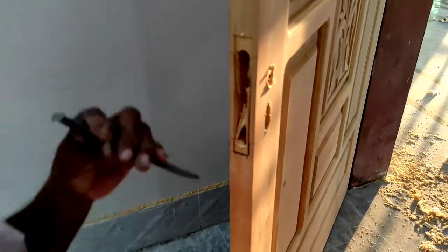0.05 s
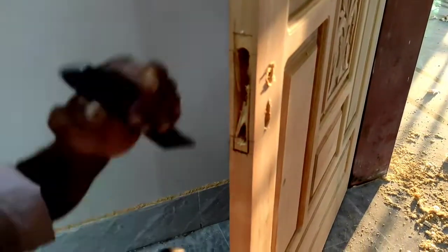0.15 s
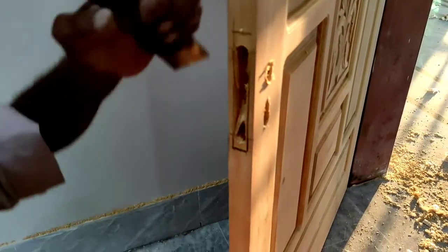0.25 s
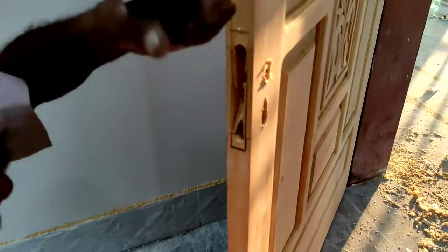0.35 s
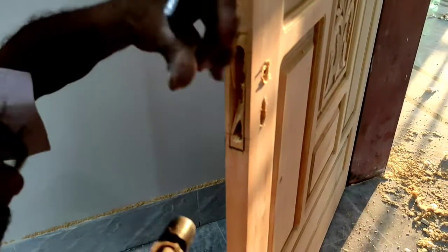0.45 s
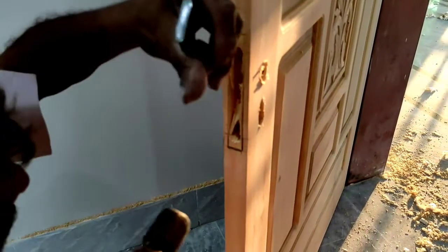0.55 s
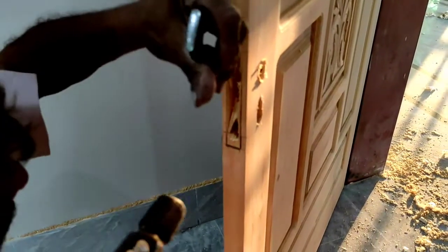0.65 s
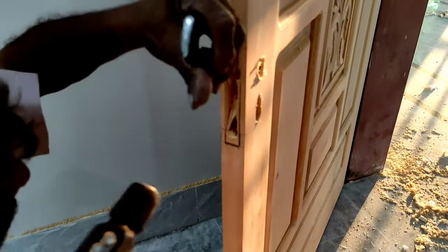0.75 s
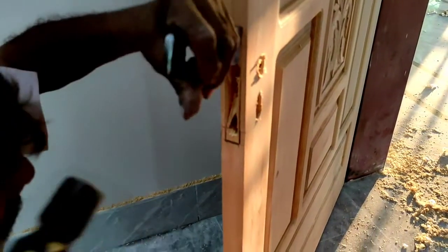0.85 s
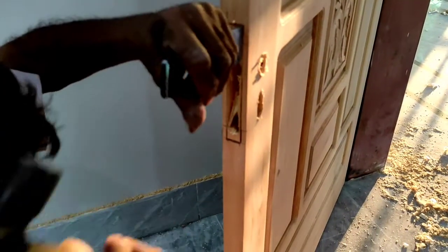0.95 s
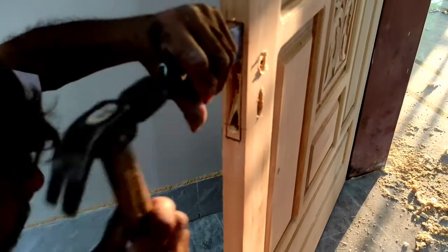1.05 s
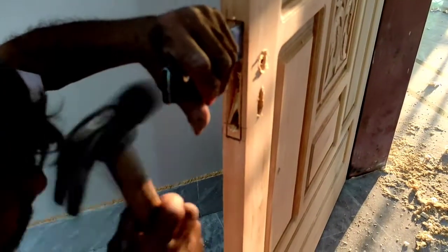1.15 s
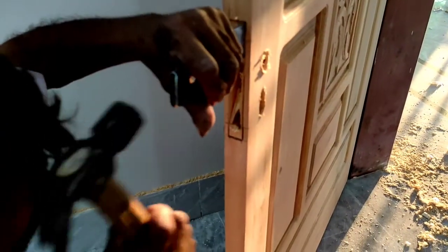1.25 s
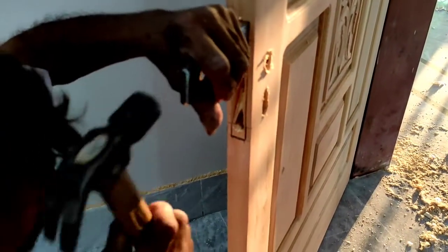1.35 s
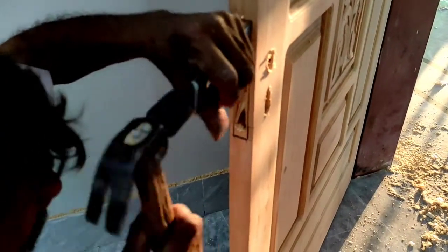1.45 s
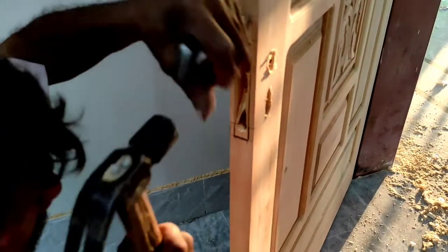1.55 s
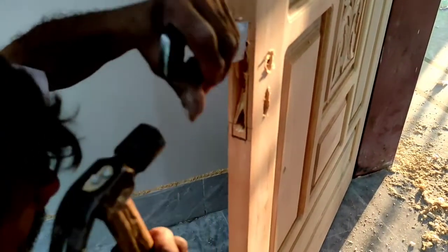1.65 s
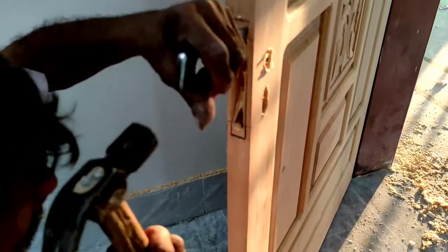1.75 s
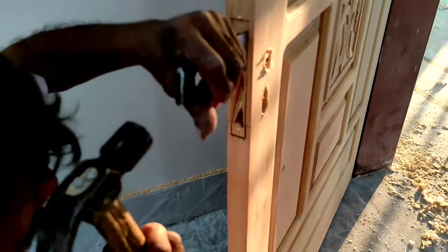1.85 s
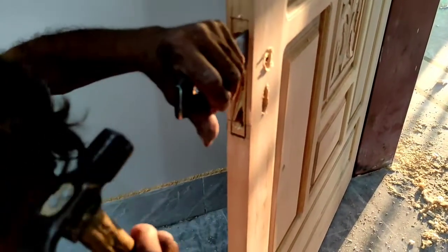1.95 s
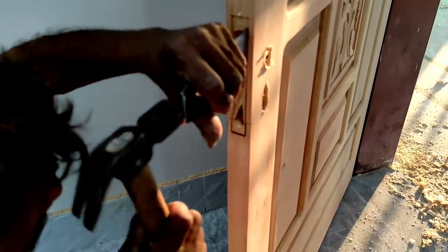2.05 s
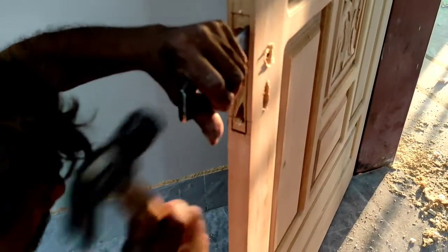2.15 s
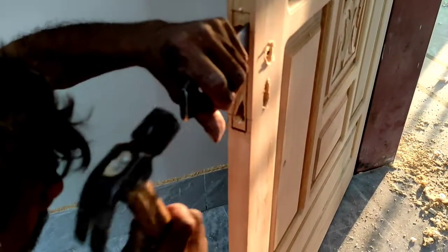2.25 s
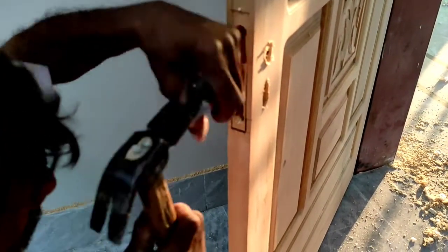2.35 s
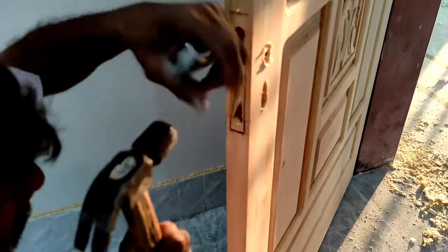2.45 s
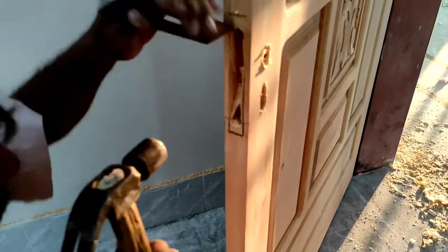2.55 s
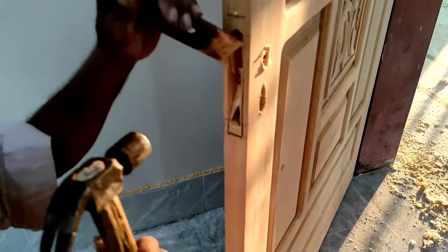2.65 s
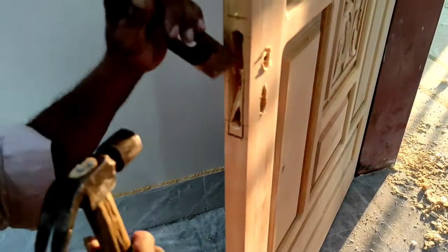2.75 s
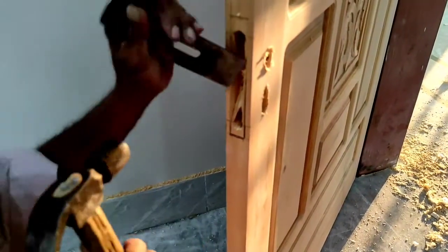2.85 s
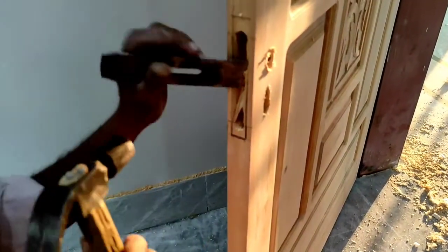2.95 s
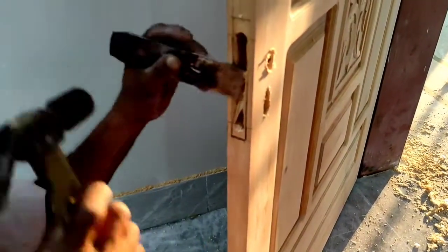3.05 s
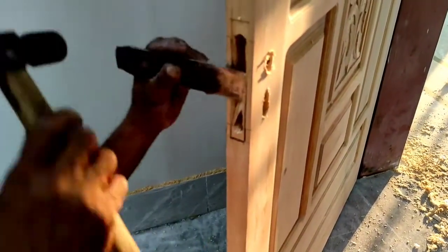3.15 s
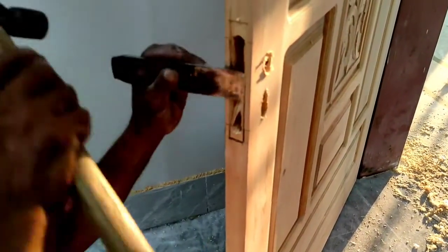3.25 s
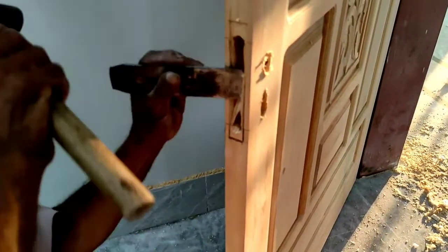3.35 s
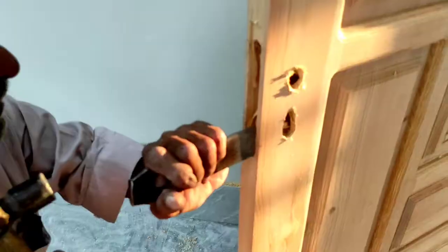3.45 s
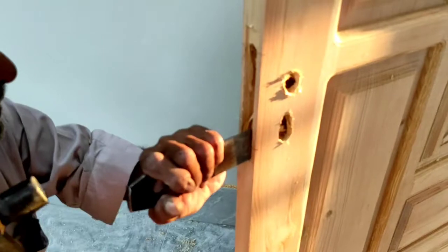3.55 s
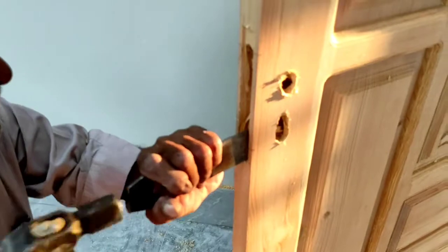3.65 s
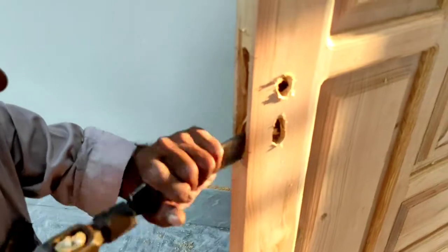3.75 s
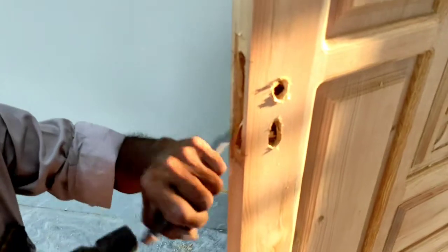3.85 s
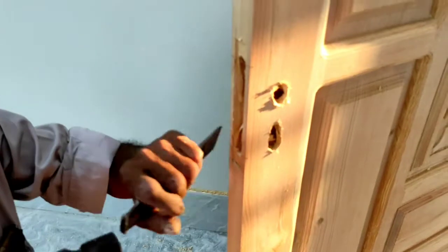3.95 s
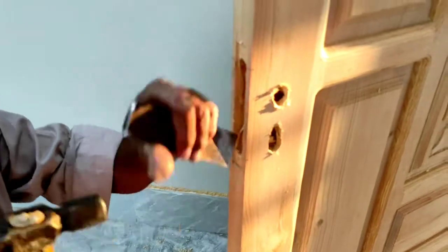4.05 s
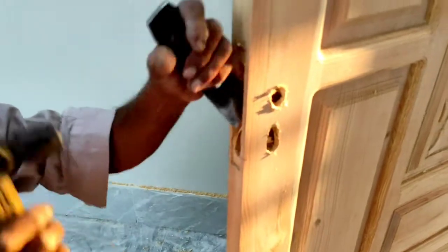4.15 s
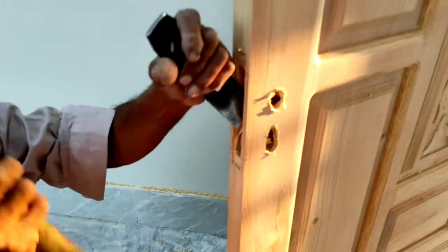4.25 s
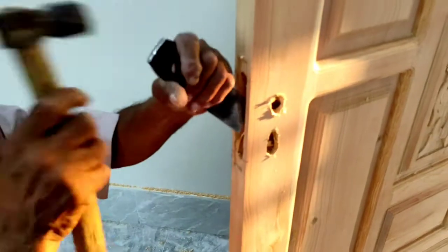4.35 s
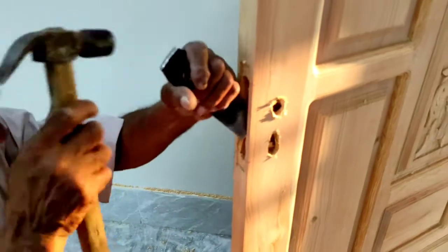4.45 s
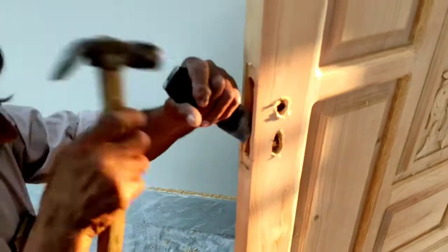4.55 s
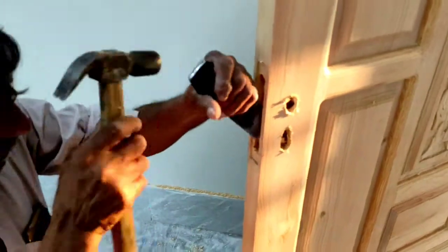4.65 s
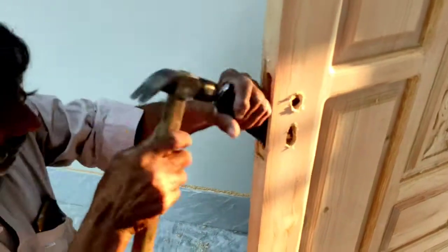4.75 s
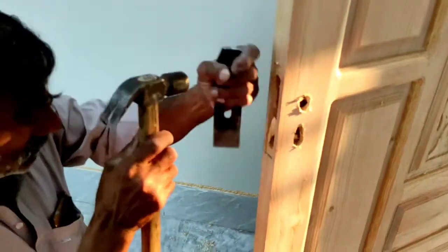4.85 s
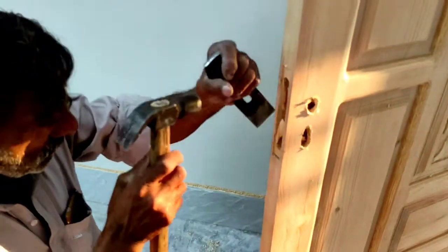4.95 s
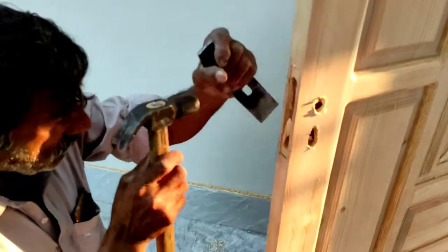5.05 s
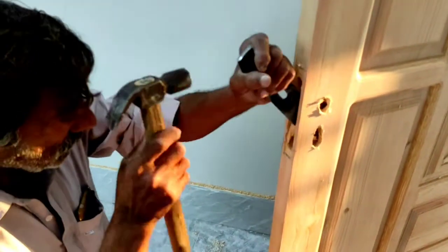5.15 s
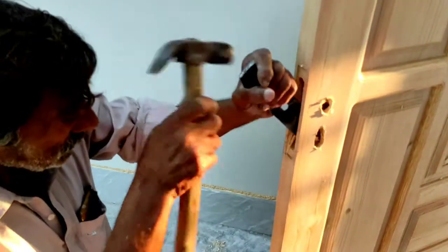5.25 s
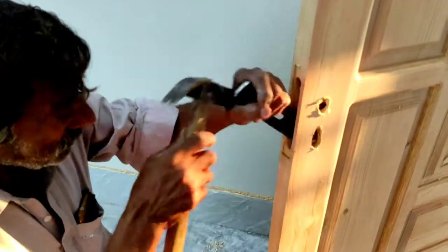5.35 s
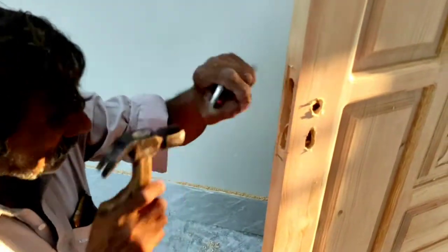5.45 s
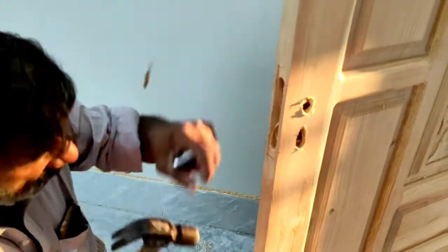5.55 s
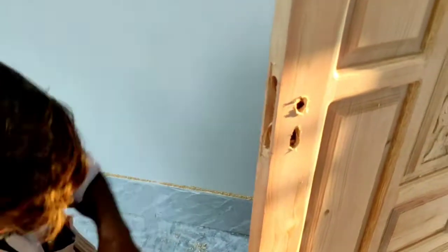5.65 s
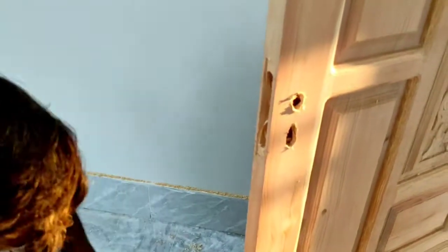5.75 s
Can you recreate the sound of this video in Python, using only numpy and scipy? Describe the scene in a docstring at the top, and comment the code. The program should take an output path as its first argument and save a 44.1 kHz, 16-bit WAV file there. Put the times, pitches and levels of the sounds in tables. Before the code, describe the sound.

Close, sharp hammer blows on a chisel set in a wooden door edge, in a bare, echoing room. After a quiet second of hum and faint scraping come four quick blows, three more, then two lighter pairs and a bit. Dull wooden knocks fall between. The close handheld stereo microphone flattens the hits, so reverberation swells up behind each one.

```python
"""A distant motor hums under room noise; a blade scrapes; then a claw hammer drives a chisel into a door edge.
The blows come in short bursts in a bare, ringing room. Each is one pulse shaped by crack, door, handle and steel.
Between bursts the chisel knocks (resonant pulses) and scrapes (grainy noise with snaps) in the pocket.
Hum is wavering sines, room noise is filtered noise, the room is a dying noise tail with standing waves.
A limiter flattens the blows, so the room swells up behind each one."""
import sys
import numpy as np
from scipy import signal
from scipy.fft import rfft, irfft, next_fast_len
from scipy.io import wavfile
from scipy.ndimage import uniform_filter1d

SR = 44100
rng = np.random.default_rng(int(sys.argv[2]) if len(sys.argv) > 2 else 0)


def log_audio(samples):
    """Write samples as a 16-bit WAV file to the path given in sys.argv[1]."""
    # one column per channel
    frames = np.atleast_2d(samples).T
    # limit to full scale, then quantise
    limited = np.clip(frames, -1, 1)
    pcm = np.round(limited * 32767).astype(np.int16)
    wavfile.write(sys.argv[1], SR, pcm)


N = 255339

# room noise and microphone hiss, as equally dense white noise: hz, level_db
NOISE_SPECTRUM = [(20, -41.5), (60, -57), (115, -42), (160, -49.5), (250, -56.5), (340, -42.5), (650, -49),
                  (1000, -54.5), (2000, -59.5), (4000, -66), (8000, -73.5), (12000, -73), (16000, -56.5)]
# distant motor partials: pitch_hz, level_db
MOTOR_PARTIALS = [(107.7, -72), (215.3, -58.5), (301.5, -72), (452.2, -73), (602.9, -77), (694.4, -71)]
# level offset of the hum, which drops midway: time_s, offset_db
MOTOR_LEVEL = [(3.4, 1.5), (3.6, -5)]
# strokes of the blade over the wood: start_s, end_s, level_db
SCRAPES = [(0.0, 0.036, -68.5), (0.307, 0.52, -76), (2.88, 3.336, -71), (3.334, 3.447, -63.5)]
# scrape colour: hz, level_db
SCRAPE_SPECTRUM = [(100, 21), (600, 22.5), (1400, 11), (3200, 13.5), (5000, 8), (12000, -1), (16000, 4)]
# air pushed at the microphone by hard blows: start_s, level_db, left_share (0-1)
AIR_PUFFS = [(1.327, -19, .85), (4.714, -19, 0.3)]
# chisel against the pocket walls: start_s, level_db, pitch_hz, width_hz (before squaring)
KNOCKS = [(1.003, -3, 460, 264), (2.714, 5.5, 547, 310), (4.405, -3.5, 390, 249), (5.074, 8, 850, 1060),
          (5.293, 8.5, 376, 158), (5.448, 22, 727, 175), (5.463, 11.5, 792, 1200), (5.496, 12, 370, 237)]
# hammer blows: start_s, force_db, bite_db (how well the edge passes the blow into the wood),
# note_hz (strongest note of chisel and wood), note_db (at force 0)
BLOWS = [(1.194, 0, -7, 2620, 19), (1.326, 11, -7.5, 2800, 13), (1.4475, 2, -2.5, 885, 20),
         (1.574, 0.5, -1.5, 3460, 21), (2.215, 3, -2.5, 4150, 23), (2.3352, 3.5, -1.5, 5930, 17),
         (2.4456, 0, -3, 2380, 20.5), (3.771, -4.5, -4.5, 1280, 28.5), (3.8686, -4, -4.5, 1460, 23),
         (4.527, 1.5, -4.5, 700, 14), (4.7125, 2, -12.5, 3140, 21), (4.8565, -1.5, -7, 685, 18),
         (5.417, -7, -38, 7300, 23)]
# the hand loosens as it turns the chisel: time_s, looseness (0-1)
GRIP_LOOSENESS = [(2.5, 0), (3.9, 0.72), (4.5, 1)]
# crack colour: hz, level_db
CRACK_SPECTRUM = [(30, -76), (100, -4.5), (300, -25), (900, -7), (2000, -1), (3200, 4), (5200, 3),
                  (7000, 1), (9000, -0.5), (12500, -5), (13500, 5), (16000, -33)]
# door resonances: pitch_hz, width_hz, level_db
DOOR_MODES = [(172, 26.4, -7.5), (364.6, 62, -2.5), (638, 197, -4), (1227, 127, -2.5)]
# handle resonances: pitch_hz, width_hz, level_db
HANDLE_MODES = [(1918, 178, 3.5), (2067, 300, 0), (2970, 113, -0.5), (3740, 350, -0.5), (4000, 210, 0),
                (5920, 160, -0.5), (10330, 1040, -2.5)]
# steel resonances: pitch_hz, width_hz, level_db
STEEL_MODES = [(7600, 400, -12), (10050, 550, -8), (14700, 550, -2)]
# thin ring of the blade in a loose grip: pitch_hz, width_hz, level_db
BLADE_MODES = [(6008, 20, -21), (7500, 20, -23), (9921, 20, -21), (12520, 12, 0), (14836, 20, -19)]
# reverberation time: hz, t60_s
ROOM_T60 = [(100, 0.55), (300, 1.63), (700, 1.14), (1800, 1.002), (3800, 0.85), (5000, 0.77), (10000, 0.66),
            (15000, 0.44)]
# standing waves of the room: pitch_hz, level_db, t60_s
STANDING_WAVES = [(69, -51, 2.5), (139, -57, 1.8), (199, -51, 2), (290, -58, 1.8), (380, -62, 1.7),
                  (431, -58, 1.7), (534, -60, 1.5), (575, -61, 1.5), (601, -61, 1.4), (957, -60, 1.2)]
# likeness of diffuse sound at the two microphone ports: hz, likeness (0-1)
PORT_LIKENESS = [(30, .8), (120, .9), (300, .97), (600, .75), (1100, .75), (2000, 0), (16000, 0)]
# microphone port balance: hz, left_minus_right_db
PORT_BALANCE = [(30, 0.5), (125, 5), (500, 4), (1000, 3), (2200, 2.4), (4000, 0.7), (9000, -.4),
                (14000, -5)]

TAPS = 16384
HZ = np.fft.rfftfreq(TAPS, 1 / SR)
ROOM_S = np.arange(4 * TAPS) / SR
DIRECT_DB, NEAR_DB, TAIL_DB = -9.5, -14.5, -35
KNOCK_DIRECT_DB, KNOCK_NEAR_DB = -6, -11.5
# at force 0 dB, full bite, tight grip
CRACK_DB, DOOR_DB, HANDLE_DB, STEEL_DB = 11, 21.5, 23, 17
STEEL_FOLLOWS = 0.15  # steel dB per force dB: even a light tap rings it
LOOSE_STEEL_DB, LOOSE_HANDLE_DB = 3, -8.5  # change at full looseness
BLADE_DB, TIGHT_BLADE_DB = 41, -60  # loose-grip level; change in a tight grip
PORT_HZ, PORT_WIDTH_HZ, PORT_DB = 14750, 900, 10
LIMIT_DB, RECOVERY_DB_PER_S, EDGE_HZ = -20, 120, 15500


def amp(db):
    """Decibels to gain."""
    return 10 ** (np.asarray(db) / 20)


def read(points, hz):
    """A table's value at hz, on a log-frequency axis."""
    f, value = np.transpose(points)
    return np.interp(np.log(hz + 1), np.log(f + 1), value)


def at_time(points, s):
    """A curve's value at time s."""
    return np.interp(s, *np.transpose(points))


def add(mix, start_s, sound):
    """Mixes a stereo sound in at start_s, cut at the end of the mix."""
    part = mix[:, max(round(start_s * SR), 0):][:, :sound.shape[1]]
    part += sound[:, :part.shape[1]]


def coloured(x, curve_db):
    """Filters x by a function from Hz to dB."""
    size = next_fast_len(x.shape[-1] + TAPS)
    gain = amp(curve_db(np.fft.rfftfreq(size, 1 / SR)))
    return irfft(rfft(x, size) * gain, size)[..., :x.shape[-1]]


def diffuse(size):
    """White noise from all directions: alike at both ports in the bass, unrelated in the treble."""
    left, other = rfft(rng.standard_normal((2, size)))
    same = np.clip(read(PORT_LIKENESS, np.fft.rfftfreq(size, 1 / SR)), -1, 1)
    right = same * left + np.sqrt(1 - same ** 2) * other
    return irfft(np.array([left, right]), size)


def resonances(modes):
    """Power spectrum of a set of damped modes."""
    power = 0
    for hz, width_hz, db in modes:
        detuning = (HZ ** 2 - hz ** 2) / (width_hz * HZ + 1e-9)
        power = power + amp(db) ** 2 / (1 + detuning ** 2)
    return power


def struck(power):
    """Minimum-phase pulse of this power spectrum: sharp start, then dying away."""
    log_gain = np.log(power + 1e-9) / 2
    circle = np.concatenate([log_gain, log_gain[-2:0:-1]])
    return np.fft.ifft(np.exp(np.conj(signal.hilbert(circle)))).real[:TAPS // 2]


def room_noise():
    """Diffuse noise coloured as room noise and microphone hiss."""
    noise = diffuse(next_fast_len(N))[:, :N]
    return coloured(noise, lambda hz: read(NOISE_SPECTRUM, hz))


def motor_hum():
    """Steady sine partials, each wavering slightly in level; the whole hum drops midway."""
    t = np.arange(N) / SR
    hum = np.zeros(N)
    for hz, db in MOTOR_PARTIALS:
        waver_db = np.interp(t, np.linspace(0, t[-1], 30), rng.standard_normal(30))
        level = amp(db + at_time(MOTOR_LEVEL, t) + waver_db)
        hum += level * np.sin(2 * np.pi * (hz * t + rng.random()))
    return hum


def standing_waves():
    """One dying complex oscillation for each standing wave of the room."""
    hz, db, t60_s = np.transpose(STANDING_WAVES)[:, :, None]
    return amp(db) * np.exp((2j * np.pi * hz - np.log(1000) / t60_s) * ROOM_S)


def room(pulse, waves, direct_db=DIRECT_DB, near_db=NEAR_DB):
    """Direct sound, quick reflections off door and wall, then a dense tail with standing waves."""
    t = ROOM_S
    hz, frame_s, noise = signal.stft(diffuse(len(t)), SR, nperseg=512)
    decay = np.exp(-np.log(1000) * frame_s / read(ROOM_T60, hz)[:, None])
    response = amp(TAIL_DB) * signal.istft(noise * decay, SR, nperseg=512)[1][:, :len(t)]
    phases = np.exp(2j * np.pi * rng.random(len(waves)))
    response += (phases @ waves).real
    # echoes build up and arrive in clumps
    knots_s = t[::220]
    clumps = np.interp(t, knots_s, amp(rng.normal(0, 1.3, len(knots_s))))
    response *= (1 - np.exp(-t / .007)) * clumps
    response[[0, 1], [6, 0]] += amp(direct_db)  # left port 6 samples later
    reflections = rng.uniform([.0015, -12, -1], [.008, 16, 1], size=(16, 3))
    for delay_s, left_lag, strength in reflections:
        at = int(delay_s * SR)
        response[[0, 1], [at + int(left_lag), at]] += amp(near_db) * strength
    return signal.fftconvolve(pulse[None], response, axes=1)


def scrape(length_s, db, grain_db=2.0, rise_s=0.0011, fade_s=0.086, snaps_per_s=45, snap_db=14):
    """Fibres catch on the sliding blade: a grainy hiss with tiny snaps."""
    t = np.arange(2 * TAPS) / SR
    knots_s = t[::128]
    grain = np.interp(t, knots_s, rng.standard_normal(len(knots_s)))
    snaps = (rng.random(len(t)) < snaps_per_s / SR) * rng.standard_normal((2, len(t)))
    stroke = np.minimum(t / rise_s, 1) * np.exp(-np.maximum(t - length_s, 0) / fade_s)
    hiss = coloured(diffuse(len(t)) + amp(snap_db) * snaps, lambda hz: read(SCRAPE_SPECTRUM, hz))
    return hiss * stroke * amp(db + grain_db * grain)


def air_puff(db, left_share, fall_s=0.00835, back_s=0.052, back=0.14):
    """A short drop in pressure and its slow swing back, shared between the ports."""
    t = np.arange(TAPS) / SR
    drop = t / (fall_s / 2) * np.exp(1 - 2 * t / fall_s)
    swing_back = back * t / back_s * np.exp(1 - t / back_s)
    wave = amp(db) * (swing_back - drop)
    return np.array([left_share * wave, (1 - left_share) * wave])


def knock(db, hz, width_hz, click_db=-25, thud_db=-18):
    """A dull wooden knock that swells over a few cycles, with a faint click and the thud of the door."""
    body = resonances([(hz, width_hz, 0)]) ** 2  # squared: slower swell
    click_and_thud = resonances([(1490, 1600, click_db), (75.6, 12.0, thud_db)])
    return amp(db) * struck(body + click_and_thud)


def door_panels():
    """Power gain by frequency: the door's many fine panel modes ripple the spectrum of every blow."""
    ripple = uniform_filter1d(rng.standard_normal(len(HZ)), size=12)
    ripple = uniform_filter1d(ripple, size=9)
    depth_db = np.interp(HZ, [300, 1800], [.8, 2.3])
    gain = amp(depth_db * ripple / ripple.std()) ** 2
    return gain / gain.mean()


def hammer_contact():
    """An impulse, then bright chatter of the hammer face on the handle for about a millisecond."""
    t = np.arange(256) / SR
    chatter = rng.standard_normal(len(t)) * np.exp(-t / .0007)
    contact = np.diff(chatter, prepend=0)  # brightens
    contact *= .45 / np.linalg.norm(contact)
    contact[0] = 1
    return contact


def blow(panels, loose, force_db, bite_db, note_hz, note_db):
    """One contact sounds all parts at once: the wood by its bite, the steel by the grip."""
    wood_db = force_db + bite_db
    door_db = DOOR_DB + wood_db
    handle_db = HANDLE_DB + wood_db + LOOSE_HANDLE_DB * loose
    steel_db = STEEL_DB + STEEL_FOLLOWS * force_db + LOOSE_STEEL_DB * loose
    blade_db = BLADE_DB + force_db + TIGHT_BLADE_DB * (1 - loose)
    power = amp(CRACK_DB + force_db + read(CRACK_SPECTRUM, HZ)) ** 2
    for db, modes in ((door_db, DOOR_MODES), (handle_db, HANDLE_MODES), (steel_db, STEEL_MODES)):
        power = power + amp(db) ** 2 * resonances(modes)
    note_width_hz = min(.35 * note_hz, 560)  # before squaring
    note = resonances([(note_hz, note_width_hz, 0)]) ** 2
    power = power + amp(note_db + force_db) ** 2 * note
    power = panels * power + amp(blade_db) ** 2 * resonances(BLADE_MODES)
    return signal.fftconvolve(struck(power), hammer_contact())


def scene():
    """Blows and knocks ring in the room, over scrapes, air puffs, room noise and hum."""
    mix = room_noise() + motor_hum()
    panels, waves = door_panels(), standing_waves()
    for start_s, end_s, db in SCRAPES:
        add(mix, start_s, scrape(end_s - start_s, db))
    for start_s, db, left_share in AIR_PUFFS:
        add(mix, start_s, air_puff(db, left_share))
    for start_s, *settings in KNOCKS:
        add(mix, start_s, room(knock(*settings), waves, KNOCK_DIRECT_DB, KNOCK_NEAR_DB))
    for start_s, *settings in BLOWS:
        loose = np.clip(at_time(GRIP_LOOSENESS, start_s), 0, 1)
        add(mix, start_s, room(blow(panels, loose, *settings), waves))
    return mix


def ports_db(hz):
    """Gain of the left and right microphone ports: a ring in the top treble plus their balance."""
    ring_db = PORT_DB / (1 + (2 * (hz - PORT_HZ) / PORT_WIDTH_HZ) ** 2)
    return ring_db + np.outer([.5, -.5], read(PORT_BALANCE, hz))


def limiter(x):
    """Turns both channels down where their smoothed power exceeds the limit, then recovers steadily."""
    keep = np.exp(-1 / (.005 * SR))  # 5 ms power average
    power = signal.lfilter([1 - keep], [1, -keep], (x ** 2).mean(0))
    power_db = 10 * np.log10(power + 1e-12)
    recovery_db = RECOVERY_DB_PER_S * np.arange(N) / SR
    held_db = np.maximum.accumulate(power_db + recovery_db) - recovery_db
    over_db = np.maximum(held_db - LIMIT_DB, 0)
    return x * amp(-uniform_filter1d(over_db, size=160))  # the very start of a blow slips through


def record(dry):
    """Port colour, peak rounding, limiter, second peak rounding, then the band limit."""
    x = np.tanh(coloured(dry, ports_db))
    x = limiter(x)
    x = .45 * np.tanh(x / .45)
    low_pass = signal.firwin(401, EDGE_HZ, window=("kaiser", 8), fs=SR)
    return signal.oaconvolve(x, low_pass[None], "same")


dry = scene()
out = record(dry)
log_audio(out)
```